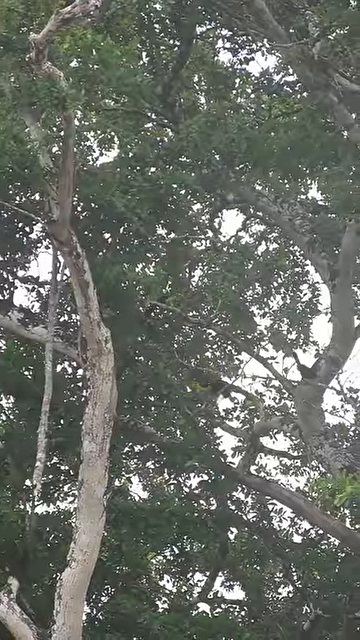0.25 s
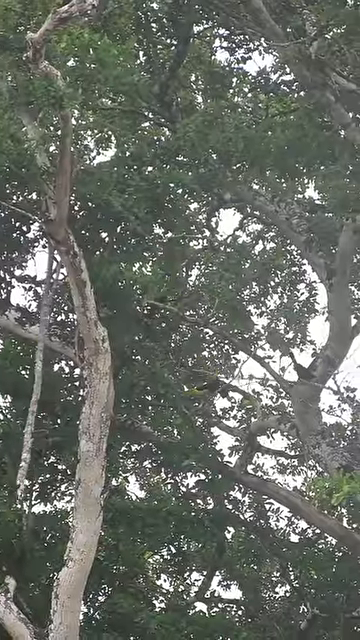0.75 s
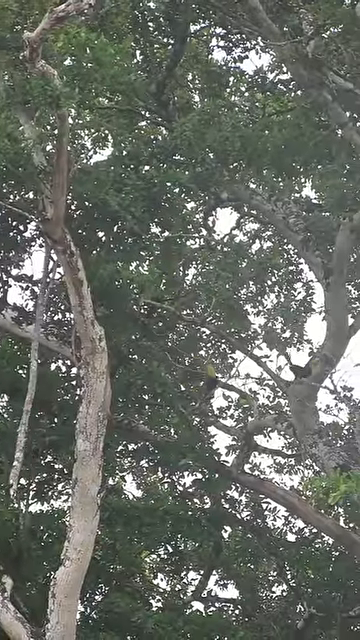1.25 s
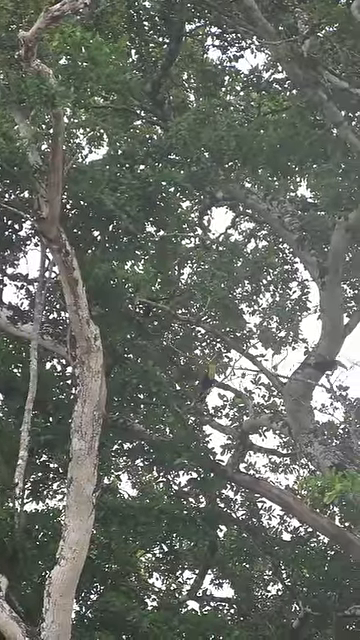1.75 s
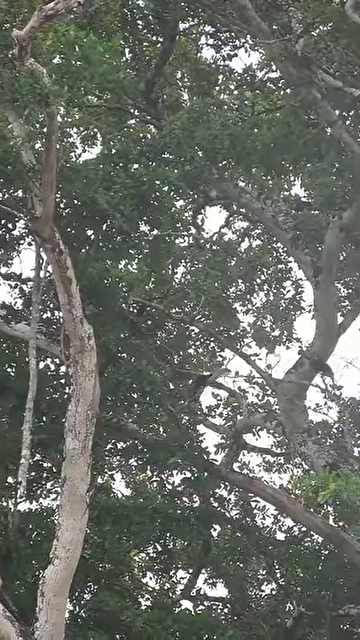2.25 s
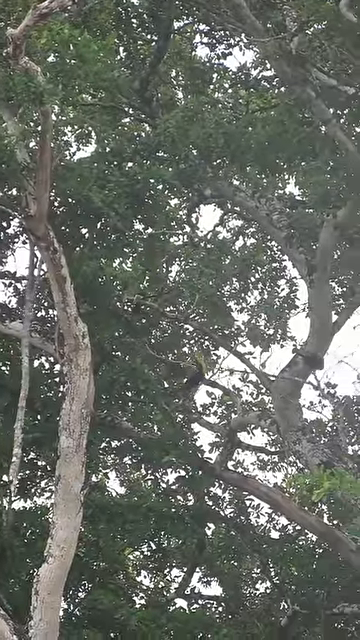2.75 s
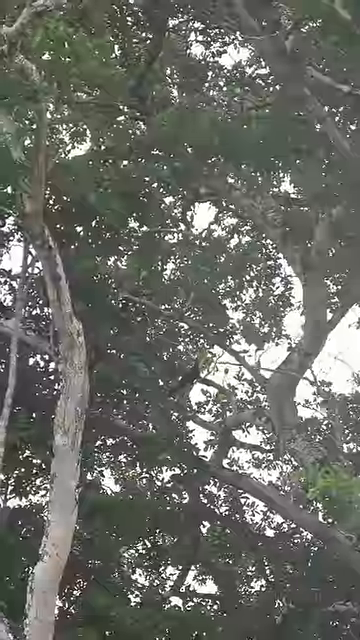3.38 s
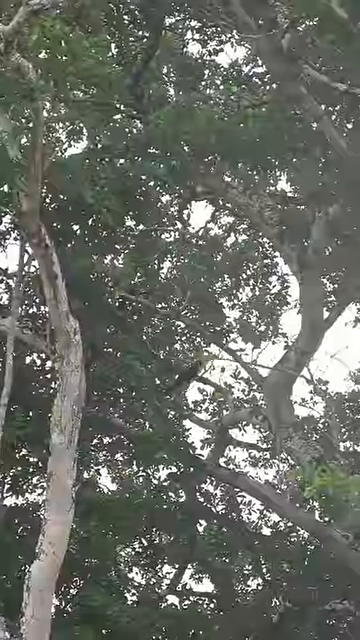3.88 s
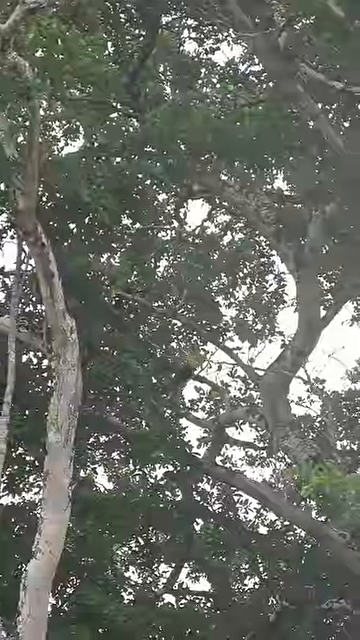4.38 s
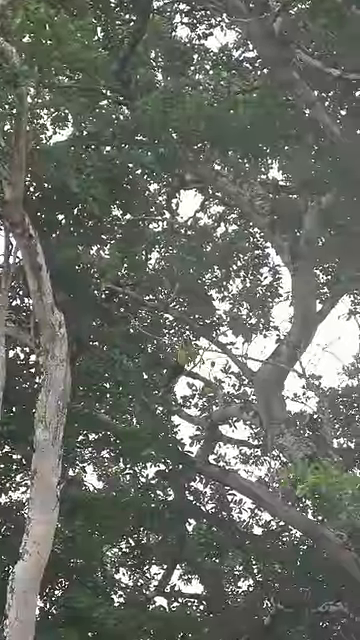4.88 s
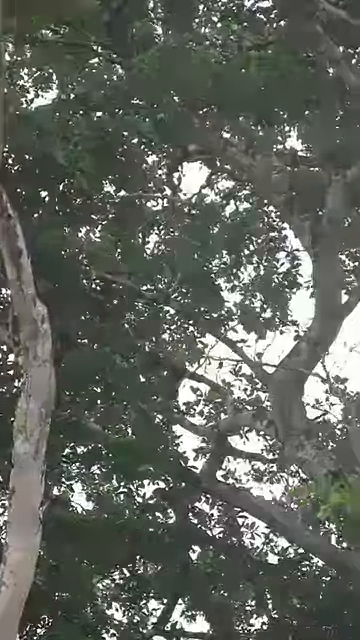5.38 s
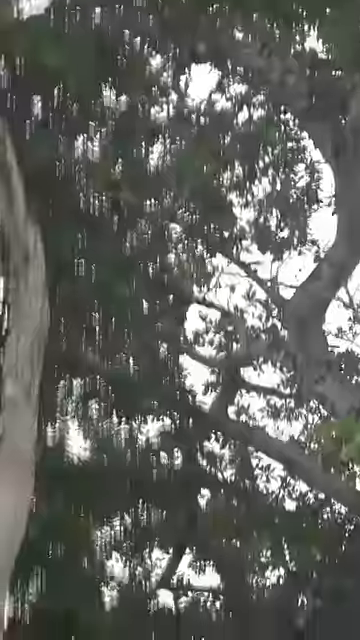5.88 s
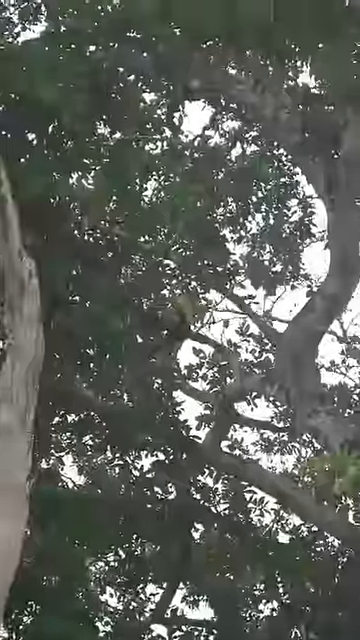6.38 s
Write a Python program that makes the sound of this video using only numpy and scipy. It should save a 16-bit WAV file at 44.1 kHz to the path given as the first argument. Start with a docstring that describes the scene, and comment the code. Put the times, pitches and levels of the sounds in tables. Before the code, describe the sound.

Toucans trade short rattling croaks in a rainforest tree over faint small birds and insects, with a distant thud and close knocks.

```python
"""Toucans croak to each other high in a rainforest tree: each croak is a rattle of syrinx pulses
that speeds up, rises, now and then breaks into a squeak, and runs out in slow clucks.
Small birds whistle farther off over insects, murmuring air and a faint machinery hum.
Something thuds in the distance. A finger knocks on the camera casing, and the background
turns dull for a moment under a faint hollow tone."""
import sys
import numpy as np
from scipy import signal
from scipy.fft import rfft, irfft, next_fast_len
from scipy.io import wavfile
from scipy.ndimage import map_coordinates

SR = 44100
rng = np.random.default_rng(int(sys.argv[2]) if len(sys.argv) > 2 else 0)


def transcribe(u):
    """Save the signal u as a 16-bit wav file named by the first command-line argument.

    u: samples, shape (n,) or (channels, n), limited to [-1, 1]; the rate is SR.
    q: integer samples, one column per channel.
    """
    v = np.clip(np.atleast_2d(u).T, -1, 1)
    q = np.round(v * 32767).astype(np.int16)
    wavfile.write(sys.argv[1], SR, q)


N = 293246


def amp(db):
    """Decibels to gain."""
    return 10 ** (np.asarray(db) / 20)


def unit(x):
    """Scale to rms 1."""
    return x / np.sqrt(np.mean(x ** 2) + 1e-20)


def along(points, hz):
    """(Hz, value) points interpolated on a log frequency axis."""
    knots_hz, values = np.transpose(points)
    return np.interp(np.log(hz + 1), np.log(knots_hz + 1), values)


def bell(hz, centre_hz, width_hz):
    """Resonance hump of height 1."""
    return np.exp(-((hz - centre_hz) / width_hz) ** 2)


def gate(start_s, length_s, fade_s):
    """Window of height 1 with linear fades."""
    t = np.arange(N) / SR - start_s
    return np.clip(np.minimum(t, length_s - t) / fade_s + .5, 0, 1)


def wobble(rate_hz, size):
    """Smooth random curve, rate_hz knots a second."""
    return map_coordinates(rng.standard_normal(size // 8), [np.arange(size) * rate_hz / SR], mode="wrap")


def filtered(x, response):
    """Zero-phase filter with gain response(hz)."""
    size = x.shape[-1]
    padded = next_fast_len(size + 4096)
    return irfft(rfft(x, padded) * response(np.fft.rfftfreq(padded, 1 / SR)), padded)[..., :size]


def noise(spectrum, size):
    """Noise of rms 1, coloured by (Hz, dB) points."""
    return unit(filtered(rng.standard_normal(size), lambda hz: amp(along(spectrum, hz))))


def add(track, start_s, sound):
    """Mix a sound into the track."""
    part = track[max(round(start_s * SR), 0):][:len(sound)]
    part += sound[:len(part)]


def stereo(mid, side):
    """Mid and side to left and right."""
    return np.array([mid + side, mid - side])


def air(mid_db=-52, side_db=-45):
    """Wide, gently wavering murmur of forest air."""
    # Each row: frequency in Hz, relative density in dB.
    mid_colour = [(15, -51), (25, -3), (64, -24), (86, -9.5), (122, -8), (148, -12.5), (281, -6),
                  (389, -8.5), (421, -8.5), (614, -7), (666, -6), (945, -6.5), (1450, -8), (2490, -5.5),
                  (15500, -28.5)]
    side_colour = [(15, -33), (25, -8), (75, -6.5), (113, -7), (144, -7), (281, -5), (349, -8), (945, -6),
                   (1170, -9), (1300, -9), (3440, -16), (3720, -16.5), (4040, -17), (6730, -25.5),
                   (15500, -36.5)]
    mid = amp(mid_db + 0.6 * wobble(2.74, N)) * noise(mid_colour, N)
    side = amp(side_db + 2.0 * wobble(3.87, N)) * noise(side_colour, N)
    return stereo(mid, side)


def machinery_hum():
    """Far machinery: faint tones with drifting phase."""
    # Each row: frequency in Hz, level in dB.
    tones = [(60, -67), (120, -68), (183, -75.5), (374, -94), (435, -69), (501, -81), (600, -66),
             (779, -89)]
    t = np.arange(N) / SR
    return sum(amp(db) * np.sin(2 * np.pi * hz * t + .5 * wobble(6.5, N)) for hz, db in tones)


def insects():
    """Steady chorus: two high noise bands, independent in each ear."""
    # Each row: centre in Hz, width in Hz, level in dB.
    bands = [(6750, 480, -63.5), (9290, 880, -63.5)]
    return sum(amp(db) * unit(filtered(rng.standard_normal((2, N)), lambda hz: bell(hz, centre, width)))
               for centre, width, db in bands)


def pulse(t, rise_s, fall_s):
    """One puff through the syrinx, peaking at t = 0."""
    return np.exp(-(t / np.where(t < 0, rise_s, fall_s)) ** 2)


def syrinx(pitch_hz, second_db, third_db, rough, jitter=0.0544, rasp_db=-7, flicker_db=5):
    """Reedy tone with unsteady overtones; roughness shakes the pitch and adds rasp."""
    # Each row: frequency in Hz, relative density in dB.
    rasp_colour = [(1100, -63), (1500, 11), (1750, -1), (2200, -5), (2650, 1.5), (3500, -0.5), (4300, -7.5),
                   (5500, -7.5), (7000, -18), (12000, -31)]
    size = len(pitch_hz)
    phase = 2 * np.pi * np.cumsum(pitch_hz * (1 + jitter * rough * wobble(900, size))) / SR
    tone = np.sin(phase)
    for k, db in enumerate([second_db, third_db, third_db - 14], 2):
        gain = amp(db - 3 + flicker_db * wobble(121.5, size))
        tone += gain * np.sin(k * phase + 0.93 * wobble(299.5, size))
    return tone + amp(rasp_db) * rough * noise(rasp_colour, size)


def toucans(size_scatter_db=2, other_side_db=-6, other_ratio=1.2, cluck_gap_s=.031, lead_s=.015):
    """Pulsed croaks, half rate then full, climbing in pitch and harshness; throat and bill filter them."""
    # Each row: start, length, slow opening and pulse period in s; low and top pitch in Hz;
    # level, swell to the end, 2nd harmonic, final 3rd harmonic and cluck level in dB; roughness 0-1.
    croaks = [ (0.014, .062, 0.049, .0098, 1725, 1994, -34, -0.5, -9, -12, -40.5, 0.73),
              (0.415, .136, 0.0074, .0096, 1595, 1786, -31, -1.5, -14, -11, -36, 0.21),
              (0.647, 0.046, 0.027, 0.0094, 1857, 1968, -32.5, -8, -4, -27, -41, .35),
              (0.968, 0.13, 0.028, 0.012, 1586, 2083, -31.5, -3.5, -7, -12, -40, 0.19),
              (1.149, 0.084, 0.049, 0.0098, 1669, 2145, -35, -8, -6, -8, -54, 0.76),
              (1.254, 0.063, .045, 0.012, 1567, 1973, -28, -5.5, -11, -22, -36, 0.45),
              (1.504, 0.12, .095, 0.0099, 1587, 2034, -34.5, 4, -8.5, -13, -47, 0.27),
              (1.814, .12, 0.029, 0.0098, 1618, 2000, -34, 2.5, -6.5, -20, -42, 0.89),
              (2.084, 0.13, 0.042, 0.0097, 1553, 1935, -34.5, -7, -6, -11, -43.5, 0.5),
              (2.431, 0.12, .06, 0.01, 1755, 1942, -37.5, 7, -4.5, -10.5, -35, .6),
              (2.634, 0.15, 0.055, 0.012, 1564, 1918, -34.5, -2, -9.5, -8, -50, 0.46),
              (3.043, 0.13, 0.04, 0.014, 1660, 2120, -32.5, -6, -12, -10.5, -41, 0.71),
              (3.194, .087, 0.013, .01, 1721, 1780, -32.5, -1.5, -8.5, -13, -36.5, 0.59),
              (3.698, .004, .006, 0.0076, 1664, 1660, -35.5, 7, -9, -14, -47, 0.65),
              (3.758, 0.19, .02, .0102, 1666, 1949, -34.5, -6, -10.5, -16, -45, 0.62),
              (4.33, 0.15, .035, 0.0092, 1534, 2064, -34.5, -9, -9, -24, -50, 0.23),
              (4.813, 0.039, 0.008, 0.012, 1860, 1910, -43, -5, -5, -14, -39.5, 0.73),
              (4.897, .108, .02, .0101, 1571, 1945, -31.5, -6.5, -7, -12, -48, 0.27),
              (5.443, 0.041, 0.0021, 0.012, 1705, 1837, -35, -13, -12, -33, -44, 0.83),
              (5.5, 0.07, 0.062, 0.0076, 1562, 2034, -32, -5.5, -11.5, -17, -40.5, 0.12),
              (6.019, .12, 0.017, 0.01, 1539, 1888, -33.5, -4, -5, -10.5, -37.5, 0.49),
              (6.588, 0.1, 0.059, 0.012, 1586, 1820, -32, 1, -21, -35, -47, 0.35)]
    # Each row: centre in Hz, width in Hz, gain in dB.
    throat = [(1926, 110, 4.5), (3370, 72, 3), (4150, 444, 7), (5260, 96, 0), (5820, 320, -7.5)]
    out = np.zeros(N)
    t = np.arange(SR // 4) / SR - lead_s
    k = np.arange(20)[:, None]  # pulse index
    for (start_s, length_s, slow_s, period_s, low_hz, top_hz,
         db, swell_db, second_db, third_db, cluck_db, rough) in croaks:
        progress = np.clip(t / length_s, 0, 1)
        strain = progress ** 2.8
        harsh = np.clip(rough + 0.41 * strain, 0, 1)
        at_s = k * period_s + 0.00061 * rough * rng.standard_normal(k.shape)
        # Odd pulses stay weak during the slow opening.
        opening = np.where(k % 2, np.clip((at_s - slow_s) / period_s + .5, .08, 1), 1)
        ending = np.clip((length_s - at_s) / period_s + .5, 0, 1)
        sizes = opening * ending * amp(size_scatter_db * np.sqrt(harsh) * rng.standard_normal(k.shape))
        width = (1 - 0.425 * harsh) * np.where(at_s < slow_s, .8, 1)
        puffs = np.sum(sizes * pulse(t - at_s, 0.00413 * width, 0.00531 * width), axis=0)
        # Pitch lifts with each puff's pressure and strays between puffs.
        stray = 0.03 * (puffs - .5) + 0.04 * wobble(109.07, len(t))
        pitch_hz = (low_hz + (top_hz - low_hz) * strain) * (1 + harsh * stray)
        voice = syrinx(pitch_hz, second_db + 3 * (progress - .5), third_db - 7 * (1 - strain), harsh)
        # The other side of the syrinx joins when pushed and beats against the first.
        other_hz = low_hz * other_ratio * (1 + 0.0412 * wobble(158.6, len(t)))
        other_gain = amp(other_side_db) * harsh * np.sqrt(progress)
        other = other_gain * np.sin(2 * np.pi * np.cumsum(other_hz) / SR)
        add(out, start_s - lead_s, amp(db + swell_db * strain) * puffs * (voice + other))
        cluck_s = start_s + length_s + cluck_gap_s
        add(out, cluck_s - lead_s, amp(cluck_db) * clucks(low_hz, 2 * period_s, t))
    return filtered(out, lambda hz: amp(sum(db * bell(hz, centre, span) for centre, span, db in throat)))


def clucks(pitch_hz, spacing_s, t, count=2, step_db=-3):
    """Slow, fading puffs that close a croak."""
    puffs = sum(amp(step_db * k) * pulse(t - spacing_s * k, 0.0034, 0.0061) for k in range(count))
    return puffs * syrinx(np.full(len(t), pitch_hz), second_db=-6, third_db=-16, rough=0.61)


def scatter(x, t60_points, correlation, build_s=0.0019):
    """Diffuse stereo echoes, redrawn every third of a second as birds and leaves move."""
    out = np.zeros((2, N + SR))
    hop = SR // 3
    angle = np.arccos(correlation) / 2
    for start in range(0, N, hop):
        hz, t, spectra = signal.stft(rng.standard_normal((2, SR // 2)), SR, nperseg=256)
        decay = amp(-60 * t / along(t60_points, hz)[:, None])
        tail = signal.istft(spectra * decay * (1 - np.exp(-t / build_s)), SR, nperseg=256)[1]
        mid, side = tail / np.linalg.norm(tail[0]) * [[np.cos(angle)], [np.sin(angle)]]
        echo = signal.fftconvolve(x[None, start:start + hop], stereo(mid, side), axes=1)
        out[:, start:start + echo.shape[1]] += echo
    return out[:, :N]


def canopy(x, direct_db, branches_db, forest_db):
    """Direct sound slightly right, quick branch echoes and the long forest tail."""
    # Each row: frequency in Hz, T60 in s.
    forest_t60 = [(200, 1), (1700, 0.74), (4000, 1), (10000, 0.13)]
    direct = x * amp([[-1.2], [1.2]])
    branches = scatter(x, [(2000, 0.084)], correlation=0.82)
    tail = dulled(scatter(x, forest_t60, correlation=0.99))
    return amp(direct_db) * direct + amp(branches_db) * branches + amp(forest_db) * tail


def small_birds(waver=0.078, twitter_per_s=2, twitter_hz=4200, twitter_s=0.1013, twitter_db=-58):
    """Thin gliding whistles, some buzzy, over a faint random twitter of falling notes."""
    # Each row: start in s, length in s, start and end pitch in Hz, level in dB, roughness.
    whistles = [(0.208, .16, 2860, 2680, -52, 0.71), (0.337, 0.066, 5000, 5170, -50.5, 0.87),
                (0.349, 0.062, 3514, 3445, -45.5, 0.66), (.8, 0.24, 3250, 2965, -54.5, 0.85),
                (1.366, 0.082, 4020, 4084, -45, .96), (1.442, 0.224, 2694, 2515, -51, 0.55),
                (2.82, 0.15, 4205, 3710, -48, 1.34), (2.867, 0.23, 3260, 2683, -49, 1),
                (3.337, 0.153, 3493, 3376, -53.5, .1), (3.53, 0.2, 2490, 2684, -54.5, 0.25),
                (5.705, 0.057, 4450, 5620, -50, 1.1), (5.765, 0.12, 4005, 4294, -50.5, 0.14),
                (5.874, 0.163, 4220, 4435, -47, .2), (6.18, 0.076, 3780, 3650, -46.5, 0.3),
                (6.235, 0.19, 3235, 3044, -49, 0.37), (6.46, 0.076, 3560, 3426, -45.5, 0.16),
                (6.508, 0.14, 3380, 3800, -47, 0.42)]
    out = np.zeros(N)
    t = np.arange(SR // 3) / SR
    twitter = []
    for k in range(round(twitter_per_s * N / SR)):
        start_s = (k + rng.random()) / twitter_per_s
        hz = twitter_hz * (1 + 0.049 * rng.uniform(-1, 1))
        twitter.append((start_s, twitter_s, hz, hz * (1 - 0.0496), twitter_db, 0.594))
    for start_s, length_s, start_hz, end_hz, db, rough in whistles + twitter:
        progress = np.clip(t / length_s, 0, 1)
        glide_hz = start_hz + (end_hz - start_hz) * progress
        pitch_hz = glide_hz * (1 + waver * rough * wobble(700, len(t)))
        envelope = amp(db) * np.sin(np.pi * progress) ** 2
        add(out, start_s, envelope * np.sin(2 * np.pi * np.cumsum(pitch_hz) / SR))
    return out


def squeaks(period_s=0.0112, lead_s=.015):
    """A toucan's voice breaks: a few steady-pitched pulses whose third harmonic rings in the bill."""
    # Each row: start in s, length in s, pitch in Hz, level in dB.
    breaks = [(.522, .03, 1760, -40), (3.229, .04, 1772, -47), (3.763, .02, 1847, -52)]
    out = np.zeros(N)
    t = np.arange(SR // 8) / SR - lead_s
    for start_s, length_s, pitch_hz, db in breaks:
        puffs = sum(pulse(t - at_s, 0.0021, 0.0035) for at_s in np.arange(0, length_s, period_s))
        voice = syrinx(np.full(len(t), pitch_hz), second_db=3, third_db=7, rough=0.16)
        add(out, start_s - lead_s, amp(db) * puffs * voice)
    return out


def thud(start_s=4.428, attack_s=0.03, hold_s=0.046, t60_s=0.54, level_db=-37,
         echo_db=-13, echo_t60_s=2.2, boom_hz=184, boom_db=-7, side_db=-8):
    """Distant blow with one hollow note, smeared into a rumble by the trees."""
    # Each row: frequency in Hz, relative density in dB.
    colour = [(24, -57), (40, -22), (146, -11.5), (182, -12.5), (267, -23), (377, -9), (599, -15),
              (862, -9), (1680, -23), (1860, -22), (2230, -14.5), (2840, -36), (5000, -35), (6500, -37),
              (11000, -120)]
    t = np.arange(N) / SR - start_s
    dying_s = np.maximum(t - attack_s - hold_s, 0)
    decay = np.hypot(amp(-60 * dying_s / t60_s), amp(echo_db - 60 * dying_s / echo_t60_s))
    envelope = amp(level_db) * np.clip(t / attack_s, 0, 1) * decay
    boom = amp(boom_db) * np.sin(2 * np.pi * boom_hz * t + 0.31 * wobble(30, N))
    return envelope * stereo(noise(colour, N) + boom, amp(side_db) * noise(colour, N))


def dulled(x, edge_hz=1400, fade_s=0.021):
    """The treble dips briefly around the knocks."""
    # Each row: start in s, length in s, treble gain in dB.
    dips = [(5.134, 0.025, -14), (5.218, 0.035, -9.5), (5.288, 0.13, -9), (5.5, 0.089, -11)]
    low = filtered(x, lambda hz: 1 / (1 + (hz / edge_hz) ** 12))
    treble_db = sum(db * gate(start_s, length_s, fade_s) for start_s, length_s, db in dips)
    return low + (x - low) * amp(treble_db)


def knocks(side_db=-7, rise_share=0.061):
    """Finger scuffs and ticks coloured by the casing; the shortest have the sharpest attack."""
    # Each row: start in s, level in dB, T60 in s, treble tilt in dB.
    touches = [(5.1623, -22.5, 0.022, -4), (5.165, -25.5, .03, -3), (5.168, -29, 0.1, 7),
               (5.1862, -15.5, 0.011, -22), (5.189, -18, 0.028, -5), (5.1901, -19, 0.01, 20),
               (5.258, -42, 0.16, -3), (5.443, -33.5, 0.058, 7), (5.6821, -27, 0.025, -31),
               (5.688, -24.5, 0.021, -23)]
    # Each row: frequency in Hz, relative response in dB.
    casing = [(150, -37), (300, -31), (460, -2.5), (580, -17), (800, -7), (1200, 1), (1500, -1), (1750, 1),
              (2150, -16), (2600, 5.5), (3000, -30), (4100, -16), (5000, -24), (6700, -20.5), (9000, -28),
              (15000, -33)]
    mid, side = np.zeros(N), np.zeros(N)
    t = np.arange(SR // 8) / SR
    for start_s, db, t60_s, treble_db in touches:
        colour = [(hz, level + treble_db * np.clip(np.log2(hz / 1750), 0, 1)) for hz, level in casing]
        envelope = amp(db - 60 * t / t60_s) * (1 - np.exp(-t / (rise_share * t60_s)))
        add(mid, start_s, envelope * noise(colour, len(t)))
        add(side, start_s, amp(side_db) * envelope * noise(colour, len(t)))
    return stereo(mid, side)


def hollow_tone(start_s=5.255, length_s=0.2, fade_s=0.011, level_db=-49):
    """Noise bands sing faintly while the background is dull."""
    # Each row: centre in Hz, width in Hz, relative level in dB.
    bands = [(1220, 36, 1), (780, 520, -9.5), (4330, 70, -11.5)]
    tone = filtered(rng.standard_normal(N),
                    lambda hz: sum(amp(db) * bell(hz, centre, width) for centre, width, db in bands))
    return amp(level_db) * gate(start_s, length_s, fade_s) * unit(tone)


def scene():
    """Birds in the canopy over the forest background, a far thud and close knocks."""
    near = canopy(toucans() + squeaks(), direct_db=-1, branches_db=-3.5, forest_db=-6)
    far = canopy(dulled(small_birds()), direct_db=1.5, branches_db=-11, forest_db=0)
    background = dulled(air() + machinery_hum() + insects())
    return near + far + background + thud() + knocks() + hollow_tone()


def record(dry, top_hz=15780):
    """The camera's band limit: a brick-wall low-pass."""
    return filtered(dry, lambda hz: hz < top_hz)


dry = scene()
out = record(dry)
transcribe(out)
```